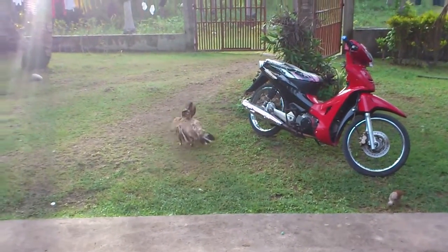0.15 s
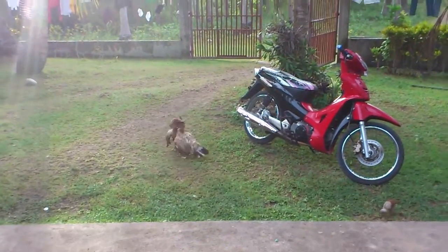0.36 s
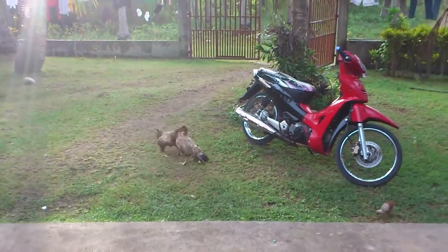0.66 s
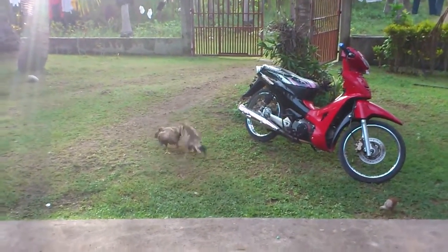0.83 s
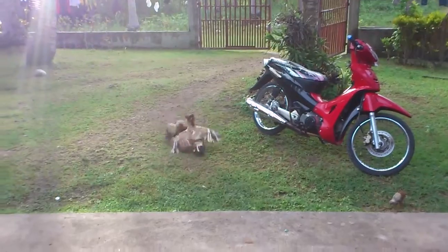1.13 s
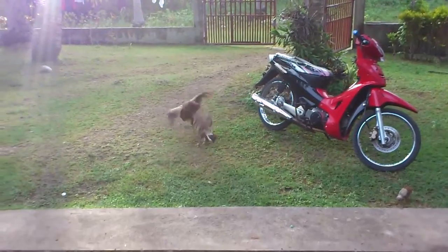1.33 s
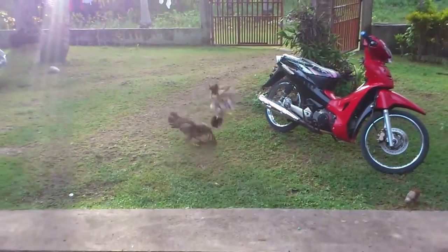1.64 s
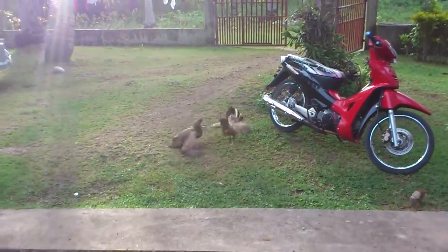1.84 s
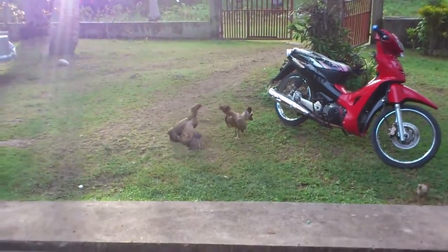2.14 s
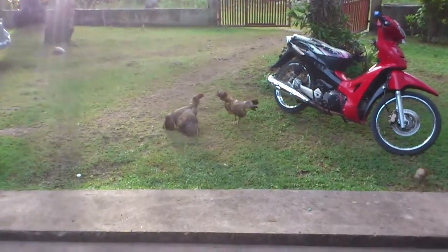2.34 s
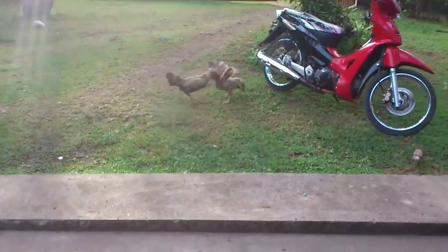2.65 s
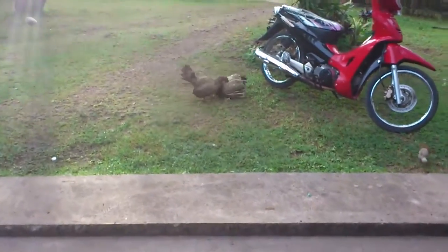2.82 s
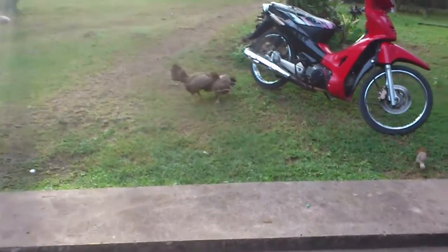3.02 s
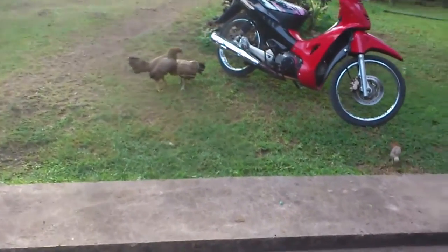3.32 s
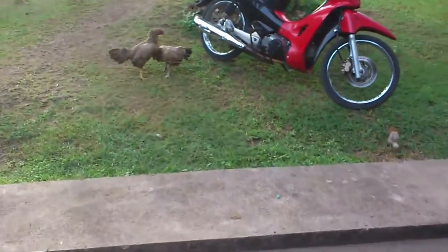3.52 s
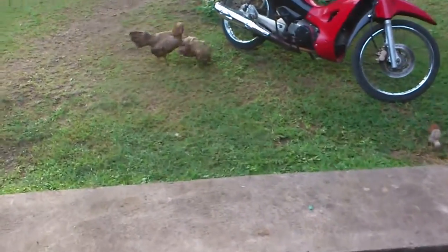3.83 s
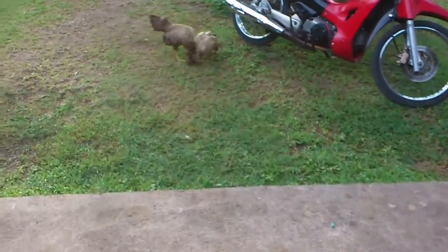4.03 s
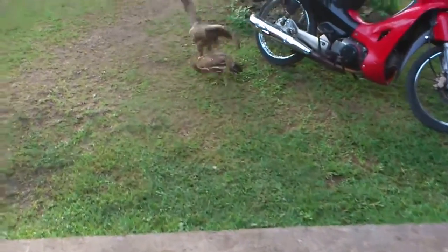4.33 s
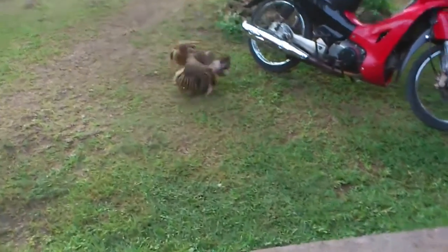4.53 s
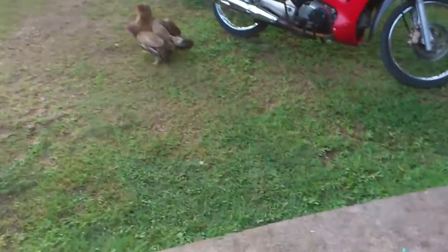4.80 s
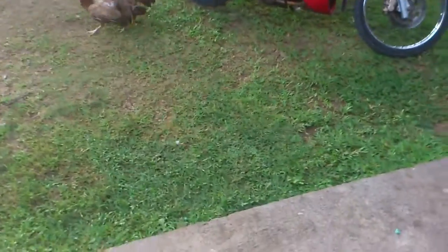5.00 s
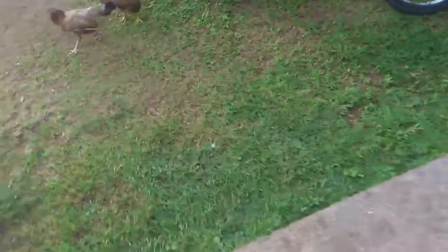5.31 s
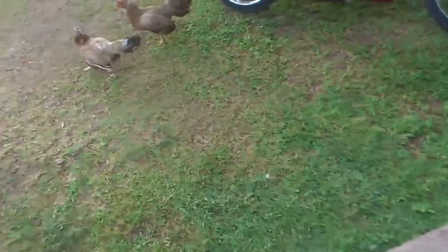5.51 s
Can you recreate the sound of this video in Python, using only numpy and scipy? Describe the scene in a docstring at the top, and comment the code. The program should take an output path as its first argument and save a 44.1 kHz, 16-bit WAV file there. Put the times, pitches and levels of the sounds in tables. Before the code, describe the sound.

Two young chickens scuffle on a lawn with bursts of wing claps and feathery swishes while chicks peep steadily in high falling whistles.

```python
"""Two young chickens scuffle on a lawn: wings clap and swish in noise bursts, low damped sines thump.
Chicks whistle over it, one close by and others further off, in gliding tones with weak overtones.
Sparse echoes and a diffuse tail make a porch ring with them; a rooster crows very far away on two harmonics.
Below lie a low rumble, a brief faint hum and the hiss of two microphones, each with its own treble colour."""
import sys
import numpy as np
from scipy import signal
from scipy.fft import rfft, irfft, next_fast_len
from scipy.io import wavfile
from scipy.ndimage import uniform_filter1d

SR = 44100
rng = np.random.default_rng(int(sys.argv[2]) if len(sys.argv) > 2 else 0)


def int16_out(signal):
    """Quantize to a 16-bit WAV file."""
    q = np.round(np.clip(np.atleast_2d(signal).T, -1, 1) * 32767)
    wavfile.write(sys.argv[1], SR, q.astype(np.int16))


N = 249606
TIME = np.arange(N) / SR


def fight():
    """Claps, swishes and low thumps, with a little echo from the house."""
    dry = wing_claps() + wing_swishes() + thumps()
    return dry + porch(dry, wet_db=-12, t60=0.35, early_db=-12, early_t60=0.06)


# wing claps and pecks: start_s, relative level_db, body_db (relative to the snap), snap_t60_s
WING_CLAPS = [(0.0835, -29.5, -13, 0.0067), (0.9706, -18, -27, 0.0029), (0.974, -33, -10, 0.01),
              (0.997, -24, -21, 0.012), (1.0101, -23, -18, 0.017), (1.4448, -31, -14.5, 0.012),
              (1.511, -20, -25.5, 0.024), (1.516, -24, -34, 0.0064), (1.5274, -23.5, -19, 0.0093),
              (1.5567, -32.5, -12, 0.019), (1.615, -34, -17, 0.016), (1.633, -28, -21, 0.023),
              (1.67, -25, -18, 0.024), (4.3222, -44, -7.5, 0.014), (4.374, -41.5, -9.5, 0.016),
              (4.4445, -35, -19, 0.015), (4.576, -32, -12.5, 0.0057)]
# the first tick of a quill: frequency_hz, relative level_db
QUILL_TICK = [(1500, -28), (4000, -8), (7000, 0), (11000, 0), (16000, -3)]
# spectrum of quills snapping together: frequency_hz, relative level_db
QUILL_SNAP = [(1000, -6.5), (2500, 5), (5000, 12.5), (8500, 7), (12000, 0), (16000, 2)]
# spectrum of the struck body: frequency_hz, relative level_db
STRUCK_BODY = [(100, -39), (250, -2), (600, 6), (1300, 7.5), (2200, 7), (4500, -28)]


def wing_claps():
    """Stiff quills meet with a sharp tick and a short snap; the struck body answers lower and longer."""
    ticks, snap, body = np.zeros((3, N))
    for start, db, body_db, t60 in WING_CLAPS:
        age = np.maximum(TIME - start, 0)
        attack = np.minimum(age / 0.00088, 1) ** 2
        # the less body a blow has, the harder and sharper its contact
        hardness = np.clip(-body_db / 30, 0, 1)
        ticks[int((start + 0.001) * SR)] += 3 * hardness * amp(db)
        snap += attack * amp(db) * fade(age, t60)
        body += attack * amp(db + np.minimum(body_db, 0)) * fade(age, 1.31 * t60)
    snap_sound = amp(-7.5) * snap * noise(QUILL_SNAP, likeness=0.15)
    body_sound = amp(5.5) * body * noise(STRUCK_BODY, likeness=0.53)
    return colour(ticks, QUILL_TICK) + snap_sound + body_sound


# wing strokes and feathers brushing: peak_s, rise_s, fall_s, relative feather_db, relative air_db
WING_STROKES = [(.085, 0.021, 0.026, -44, -53), (.835, 0.018, 0.013, -76, -61),
                (.98, 0.0072, .02, -60, -55), (1.012, 0.02, 0.032, -45.5, -54.5),
                (1.05, 0.012, 0.043, -59, -64), (1.45, 0.0073, 0.025, -48.5, -50.5),
                (1.526, 0.007, 0.019, -44, -44.5), (1.561, 0.004, 0.046, -57, -54),
                (1.635, 0.072, 0.022, -50, -59), (1.669, 0.003, 0.033, -47.5, -51),
                (1.815, 0.037, 0.061, -51, -58.5), (4.266, 0.013, 0.019, -54, -63),
                (4.33, 0.015, 0.017, -73, -67), (4.364, 0.021, 0.023, -46, -50.5),
                (4.44, 0.019, 0.069, -60, -61.5), (4.576, 0.024, 0.25, -57.5, -61.5)]
# spectrum of scraping feathers: frequency_hz, relative level_db
FEATHER_SCRAPE = [(300, -6.5), (1000, -38), (2500, -5.5), (5000, 0.5), (8000, -4.5), (11000, -8),
                  (16000, -7.5)]
# spectrum of the pushed air: frequency_hz, relative level_db
AIR_PUFF = [(50, 5), (130, -16), (240, 13), (450, -5.5), (900, 0), (1400, 2), (2200, -3), (4500, -10)]


def wing_swishes():
    """Each stroke pushes a puff of air while the feathers scrape over each other in fine crackling grains."""
    feathers, air = np.zeros((2, N))
    for peak, rise, fall, feather_db, air_db in WING_STROKES:
        stroke = np.exp(-np.maximum((peak - TIME) / rise, (TIME - peak) / fall))
        feathers += amp(feather_db) * stroke
        air += amp(air_db) * stroke
    grain = unit(amp(4.5 * walk(1800) + 2 * walk(150)))
    scrape = amp(1.0) * feathers * grain * noise(FEATHER_SCRAPE, likeness=0.051)
    return scrape + air * noise(AIR_PUFF, likeness=1.0)


# soft low thumps (bodies on the turf, a gust, a bump of the handled microphones):
# start_s, pitch_hz, level_db (at the start), t60_s
LOW_THUMPS = [(0.569, 111.5, -49, 0.4), (1.013, 168, -52, .08), (1.51, 198, -42.5, 0.083),
              (1.591, 129, -37.5, 0.052), (1.61, 212, -43, 0.031), (3.759, 40, -49.5, 0.27)]


def thumps():
    """Soft low thumps: sines that die away exponentially."""
    out = np.zeros(N)
    for start, hz, db, t60 in LOW_THUMPS:
        age = np.maximum(TIME - start, 0)
        out += amp(db - 60 * age / t60) * np.sin(2 * np.pi * hz * age)
    return out


# the close chick's cheeps: start_s, squeal_s, slide_s, length_s, break_hz, held_hz,
# last_hz (before the droop), droop_hz, then relative squeal_db, held_db, overtones_db
CLOSE_CHEEPS = [(1.937, .02, .029, 0.17, 5314, 2505, 3246, 848, -34, -24.5, -2.5),
                (2.41, .034, 0.0063, 0.17, 5025, 4234, 2906, 3, -34.5, -28.5, 2),
                (3.411, 0.055, 0.043, 0.23, 5516, 2910, 2076, 451, -49, -39.5, 2),
                (4.544, .011, .017, 0.16, 5300, 2412, 3610, 699, -34, -33.5, -3),
                (4.913, .036, 0.0256, .168, 3846, 3984, 2968, -2, -40, -25.5, -5.5),
                (5.429, .052, 0.0041, .19, 4950, 3822, 3064, 100, -34, -31, -2)]
# the other side of a chick's syrinx: start_s, length_s, first_hz, last_hz, relative level_db
SYRINX_SECOND_VOICE = [(0.254, 0.068, 5000, 4820, -48.5), (1.933, .036, 5100, 4680, -38.5),
                       (2.054, 0.059, 2340, 1970, -45), (2.561, 0.028, 2540, 1715, -38),
                       (3.594, 0.0548, 2228, 1685, -40.5), (4.646, .045, 2670, 1807, -42),
                       (4.91, 0.063, 5530, 4370, -38), (5.012, 0.071, 3350, 1790, -43.5),
                       (5.348, 0.046, 4340, 3980, -46), (5.57, .038, 2710, 1890, -45)]
# how late the close chick reaches the left microphone as the microphones turn: time_s, lag_samples
CLOSE_CHICK_LAG = [(2, 5.2), (2.45, 6.35), (3.5, 2.04), (4.6, 5.2), (5, 7.3), (5.5, 6.7)]
# what the porch returns of the close chick, brightest near 8 kHz: frequency_hz, gain_db
PORCH_RETURN = [(2000, 1), (2900, 1), (4200, -0.5), (5400, 0.5), (8000, 7.5)]


def close_chick():
    """Loud, mostly direct cheeps, joined at moments by a less steady second voice from the syrinx."""
    lag = np.interp(TIME, *np.transpose(CLOSE_CHICK_LAG))
    cheeps = [cheep(*row) for row in CLOSE_CHEEPS]
    first = whistle(cheeps, lag, second_db=-22.5, third_db=-33.5, waver=0.0044, flutter_db=2.5)
    glides = [second_voice(*row) for row in SYRINX_SECOND_VOICE]
    second = whistle(glides, 0.65 * lag, second_db=-21, third_db=-45, waver=0.028, flutter_db=3)
    direct = placed(first, db=-1.5, pan_db=9.0) + placed(second, db=-5.0, pan_db=-2.0)
    thrown = colour(first[1] + 0.5 * second[1], PORCH_RETURN)
    return direct + porch(thrown, wet_db=-12.0, t60=0.39, early_db=-5.0, early_t60=0.06)


CHEEP_ONSET_DB, CHEEP_ATTACK_S, CHEEP_RELEASE_S = 5, 0.016, 0.0086  # softer at both ends
# roughness and warble are rms shares of the pitch
SQUEAL_SAG_HZ_PER_S, SQUEAL_ROUGH, CHEEP_WARBLE = 10000, 0.0116, 0.0077
CHEEP_TIRE_DB, DROOP_S = 9.5, 0.02


def cheep(start, squeal_s, slide_s, length, break_hz, held_hz, last_hz, droop_hz,
          squeal_db, held_db, overtones_db):
    """A rough sinking squeal breaks and slides onto a warbling held note that tires and may droop."""
    span, age = note(start, length)
    squealing = np.exp(-np.maximum(age - squeal_s, 0) / slide_s)
    progress = np.clip((age - squeal_s) / (length - squeal_s), 0, 1)
    opening, closing = np.exp(-age / CHEEP_ATTACK_S), np.exp((age - length) / CHEEP_RELEASE_S)
    sinking = break_hz + SQUEAL_SAG_HZ_PER_S * np.maximum(squeal_s - age, 0)
    high = sinking * (1 + SQUEAL_ROUGH * walk(600)[span])
    droop = droop_hz * np.exp((age - length) / DROOP_S)
    glide = held_hz + (last_hz - held_hz) * progress
    held = glide * (1 + CHEEP_WARBLE * walk(70)[span]) - droop
    hz = squealing * high + (1 - squealing) * held
    db = squealing * squeal_db + (1 - squealing) * (held_db - CHEEP_TIRE_DB * progress)
    return span, hz, db - CHEEP_ONSET_DB * (opening + closing), overtones_db


def second_voice(start, length, first_hz, last_hz, db):
    """A short straight glide of the syrinx's other side, a little stronger in its middle."""
    span, age = note(start, length)
    progress = age / length
    ends_weaker_db = 1.5 * (2 * progress - 1) ** 2
    return span, first_hz + (last_hz - first_hz) * progress, db - ends_weaker_db, 0


# the chicks further off, and a small squeak from the fight: start_s, hold_s, fall_s, scoop_hz,
# knee_hz (where the fall begins), last_hz, then relative level_db, throat_ring_db, overtones_db
PEEPS_AND_SQUEAK = [(0.256, 0.11, 0.055, 449, 3345, 2550, -36, 3, -2),
                    (.385, 0.095, 0.11, 1, 3475, 2440, -47, 3.5, 5),
                    (1.009, 0.15, 0.045, 4, 3500, 2724, -45, 9.5, 6.5),
                    (1.144, 0.062, 0.078, -7, 3554, 2456, -46, 12.5, 1),
                    (1.268, 0.11, 0.12, 357, 3496, 2386, -44.5, 1.5, 3.5),
                    (1.365, .035, 0.015, 3, 2830, 2870, -45.5, 1, -4),
                    (1.615, 0.018, 0.022, 108, 2910, 2910, -45.5, -1, 15),
                    (1.997, 0.064, 0.012, 91, 3193, 2970, -33, -1, 0),
                    (2.19, .11, 0.092, 399, 3436, 2500, -43.5, -2, 5),
                    (2.304, 0.085, 0.057, 301, 3523, 2440, -44.5, 11.5, 5),
                    (2.68, 0.094, 0.059, 255, 3565, 2460, -42, 7, 8),
                    (2.809, 0.08, 0.061, 601, 3390, 2654, -43.5, 8.5, -3),
                    (3.279, 0.04, 0.037, 0, 4950, 4820, -51.5, 0, -6),
                    (3.335, 0.062, 0.1, 795, 3485, 2646, -43, 3, -1.5),
                    (3.417, .075, 0.12, 97, 3506, 3203, -48, 27, 6.5),
                    (3.886, 0.13, 0.028, 600, 3350, 2510, -45.5, 8.5, 3.5),
                    (4.057, 0.098, 0.11, 348, 3420, 2504, -41.5, -5, -3),
                    (4.229, 0.049, 0.0094, 213, 2670, 2450, -52, -10, 1),
                    (4.541, 0.1, 0.02, 400, 3480, 3300, -43.5, 3, 1),
                    (5.082, .11, 0.087, -4, 3412, 2490, -42, -3, -4),
                    (5.355, 0.1, 0.021, 708, 3004, 2580, -42.5, 3, 1)]


def far_chicks():
    """Softer peeps, and a squeak from the fight, that reach the left microphone first, blurred by echoes."""
    peeps = [peep(*row) for row in PEEPS_AND_SQUEAK]
    voice = whistle(peeps, left_lag=-11.5, second_db=-21.5, third_db=-27, waver=0.0062, flutter_db=0.97)
    echoes = porch(voice[1], wet_db=-7.0, t60=0.56, early_db=0.0, early_t60=0.22)
    return placed(voice, db=-2.0, pan_db=-1.5) + echoes


SCOOP_S, SAG_HZ_PER_S, FALL_CURVE = 0.022, 4200, 0.7
THROAT_HZ, THROAT_WIDTH_HZ = 3010, 247  # the resonance that a falling peep passes through
PEEP_ATTACK_S, SWELL_DB_PER_S, FALL_DB, OVERTONE_FALL_DB = 0.022, 49, 10, 4


def peep(start, hold_s, fall_s, scoop_hz, knee_hz, last_hz, db, ring_db, overtones_db):
    """A sagging note swells, then glides off, weaker and purer; its level alters at the throat's resonance."""
    span, age = note(start, hold_s + fall_s)
    to_knee = np.maximum(hold_s - age, 0)
    fallen = np.clip((age - hold_s) / fall_s, 0, 1)
    hz = knee_hz + scoop_hz * np.exp(-age / SCOOP_S) + SAG_HZ_PER_S * to_knee
    hz = hz + (last_hz - knee_hz) * fallen ** FALL_CURVE
    weaker = 20 * np.exp(-(age / PEEP_ATTACK_S) ** 2) + SWELL_DB_PER_S * to_knee + FALL_DB * fallen
    ring = ring_db * np.exp(-((hz - THROAT_HZ) / THROAT_WIDTH_HZ) ** 2)
    return span, hz, db - weaker + ring, overtones_db - OVERTONE_FALL_DB * fallen


# how the throat and open beak shape the overtones: frequency_hz, gain_db
BEAK_COLOUR = [(3500, -9), (5200, 8.5), (6200, 5.5), (7200, 4.5), (8000, -5), (9000, -6), (11000, -1),
               (14000, -3)]
EDGE_S = 0.006  # fade at each end of a call


def whistle(calls, left_lag, second_db, third_db, waver, flutter_db):
    """A nearly pure syrinx tone whose weak overtones pass the beak, as it reaches (left, right) microphones."""
    tone, overtones = np.zeros((2, 2, N))
    drift, flutter = 1 + waver * walk(260), flutter_db * walk(160)
    lag = left_lag + np.zeros(N)  # samples
    for span, hz, db, overtones_db in calls:
        t = TIME[span]
        pitch = uniform_filter1d(hz, size=300) * drift[span]
        to_edge = np.minimum(t - t[0], t[-1] - t)
        gate = np.sin(np.pi / 2 * np.clip(to_edge / EDGE_S, 0, 1)) ** 2
        size = np.sqrt(2) * gate * amp(db + flutter[span])
        # only the left side is shifted by the lag
        phase = 2 * np.pi / SR * (np.cumsum(pitch) - np.outer([1, 0], lag[span] * pitch))
        harmonics = amp(second_db) * np.sin(2 * phase) + amp(third_db) * np.sin(3 * phase)
        tone[:, span] += size * np.sin(phase)
        overtones[:, span] += size * amp(overtones_db) * harmonics
    return tone + colour(overtones, BEAK_COLOUR)


def note(start, length):
    """The samples that a call covers, and its age at each of them in seconds."""
    span = (TIME >= start) & (TIME < start + length)
    return span, TIME[span] - start


def placed(x, db, pan_db):
    """Set the level and the left-minus-right balance."""
    return x * amp(db + np.array([[pan_db], [-pan_db]]) / 2)


def porch(x, wet_db, t60, early_db, early_t60):
    """Sparse early echoes from floor and walls, then a diffuse tail, different at each microphone."""
    t = np.arange(SR) / SR
    tail = rng.standard_normal((2, SR)) * fade(t, t60) * np.minimum(t / 0.048, 1)
    sparse = rng.standard_normal((2, SR)) * (rng.random((2, SR)) < 0.012)
    early = sparse * fade(t, early_t60) * (t > 0.002)
    response = (amp(wet_db) * unit(tail) + amp(early_db) * unit(early)) / np.sqrt(SR)
    return signal.fftconvolve(np.atleast_2d(x), response, axes=1)[:, :N]


# the distant rooster: time_s, pitch_hz (fundamental), relative level_db
ROOSTER_CROW = [(3.2, 494, -79.5), (3.28, 486, -64), (3.45, 498, -81), (3.58, 499, -68), (3.78, 481, -78),
                (3.951, 526, -71), (4.15, 513, -69.5), (4.35, 488, -99)]


def rooster():
    """Only the second and third harmonics carry this far; the third takes over as the crow goes on."""
    s, hz, db = np.transpose(ROOSTER_CROW)
    pitch = np.interp(TIME, s, hz) * (1 + 0.0082 * walk(40))
    phase = 2 * np.pi * np.cumsum(pitch) / SR
    opening = np.interp(TIME, [3.6, 3.95], [0.2, 0.9])
    sounding = (TIME > s[0]) * (TIME < s[-1])
    size = np.sqrt(2) * amp(np.interp(TIME, s, db) + 2 * walk(45)) * sounding
    return size * ((1 - opening) * np.sin(2 * phase) + opening * np.sin(3 * phase))


# spectrum of the low outdoor rumble: frequency_hz, relative level_db
YARD_RUMBLE = [(15, -43), (25, -15), (43, 0), (124, 1), (172, -5), (262, -9.5), (331, -12), (433, -13),
               (505, -14), (601, -16.5), (2500, -32), (3250, -61), (5500, -120)]
RUMBLE_DB, RUMBLE_SWELL_DB = -60.5, 1.57  # mean level and rms swing


def yard():
    """Low outdoor rumble that swells a little, a faint wavering hum and a steady hiss."""
    rumble = noise(YARD_RUMBLE, likeness=0.75) * amp(RUMBLE_DB + RUMBLE_SWELL_DB * walk(8.7))
    return rumble + faint_hum() + microphone_hiss()


HUM_HZ, HUM_DB, HUM_START_S, HUM_LENGTH_S, HUM_FADE_DB_PER_S = 426, -68, 0.44, 2.36, 10


def faint_hum():
    """One wavering sine that eases in and slowly fades."""
    phase = 2 * np.pi * np.cumsum(HUM_HZ * (1 + 0.013 * walk(39.5))) / SR
    span, age = note(HUM_START_S, HUM_LENGTH_S)
    envelope = amp(HUM_DB - HUM_FADE_DB_PER_S * age) * signal.windows.tukey(len(age), 0.2)
    hum = np.zeros(N)
    hum[span] = np.sqrt(2) * envelope * np.sin(phase[span])
    return hum


# spectrum of the microphones' hiss: frequency_hz, relative level_db
HISS_SPECTRUM = [(1200, -3.5), (2300, -4), (3200, -4), (5000, 1.5), (7000, -3), (9000, -5.5), (11300, 4),
                 (11800, 2.5), (12200, -38), (14000, -4), (16000, -3.5)]


def microphone_hiss():
    """Steady coloured noise, almost independent on the two sides."""
    return noise(HISS_SPECTRUM, likeness=0.016) * amp(-56.5)


def amp(db):
    """Decibels to gain."""
    return 10 ** (np.asarray(db) / 20)


def unit(x):
    """Scale to rms 1."""
    return x / np.sqrt(np.mean(x ** 2))


def fade(age, t60):
    """Exponential decay that loses 60 dB in t60 seconds."""
    return np.exp(-np.log(1000) * age / t60)


def colour(x, points):
    """Filter by a spectrum of (Hz, dB) points, joined along log frequency."""
    hz, db = np.transpose(points)
    size = next_fast_len(N + SR // 10, True)
    bins = np.maximum(np.arange(size // 2 + 1) * SR / size, 1)
    gain = amp(np.interp(np.log(bins), np.log(hz), db))
    return irfft(rfft(x, size) * gain, size)[..., :N]


def noise(points, likeness):
    """Coloured stereo noise of rms 1; likeness is the share of power common to both sides."""
    likeness = np.clip(likeness, 0, 1)
    white = rng.standard_normal((3, N))
    mixed = np.sqrt(likeness) * white[0] + np.sqrt(1 - likeness) * white[1:]
    return unit(colour(mixed, points))


def walk(rate):
    """Slow chance of rms 1: random levels held 1 / rate s and smoothed twice."""
    k = max(int(SR / rate), 1)
    steps = np.repeat(rng.standard_normal(N // k + 1), k)
    return unit(uniform_filter1d(uniform_filter1d(steps, k), k)[:N])


def scene():
    """The fight, the chicks and the yard around them."""
    return fight() + close_chick() + far_chicks() + rooster() + yard()


# microphone colour: frequency_hz, left_db, right_db
MICROPHONE_COLOUR = [(1510, 0, 0.5), (3000, 2, 0.5), (4030, 0, 6.5), (5100, -4, 1), (6850, 1.5, 0.5),
                     (8500, 6.5, -4), (9460, 11, -5), (10800, 8, -8.5), (13860, 1, -8.5), (16150, -24, -3)]
TOP_HZ = 15600


def record(dry):
    """Each microphone colours the treble in its own way; the top is cut steeply."""
    hz, left_db, right_db = np.transpose(MICROPHONE_COLOUR)
    left = colour(dry[0], np.column_stack([hz, left_db]))
    right = colour(dry[1], np.column_stack([hz, right_db]))
    # order 8, 0.2 dB ripple, 70 dB rejection
    top_cut = signal.ellip(8, 0.2, 70, TOP_HZ, fs=SR, output="sos")
    return signal.sosfilt(top_cut, np.array([left, right]))


dry = scene()
out = record(dry)
int16_out(out)
```